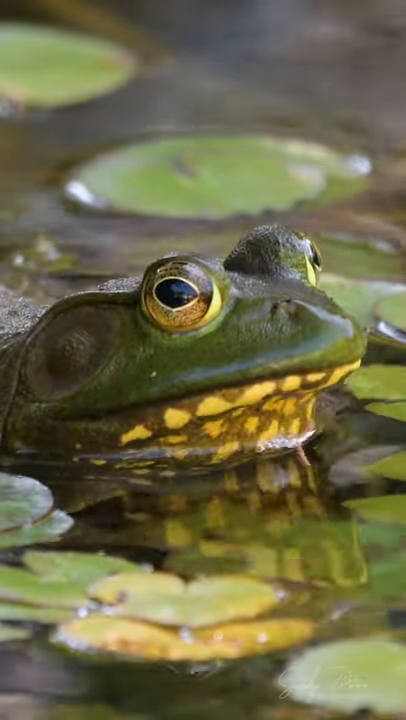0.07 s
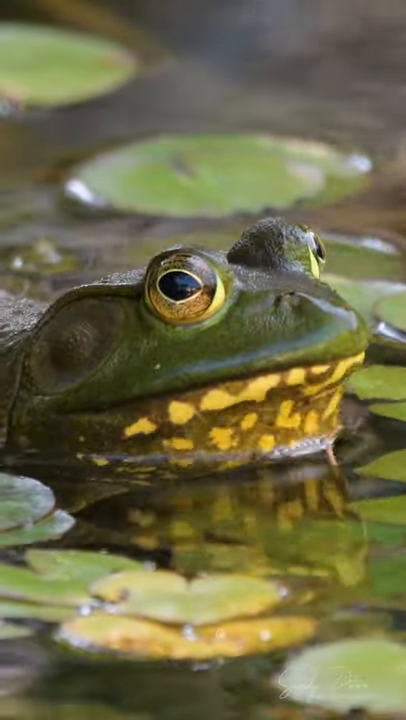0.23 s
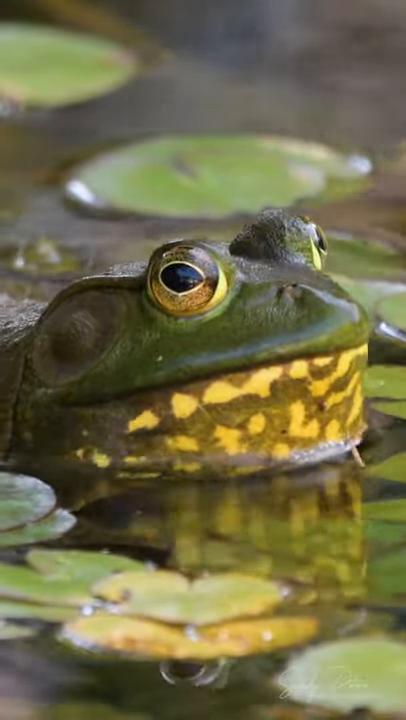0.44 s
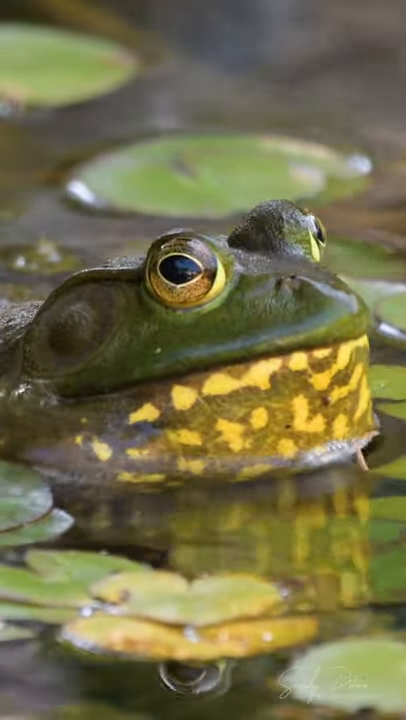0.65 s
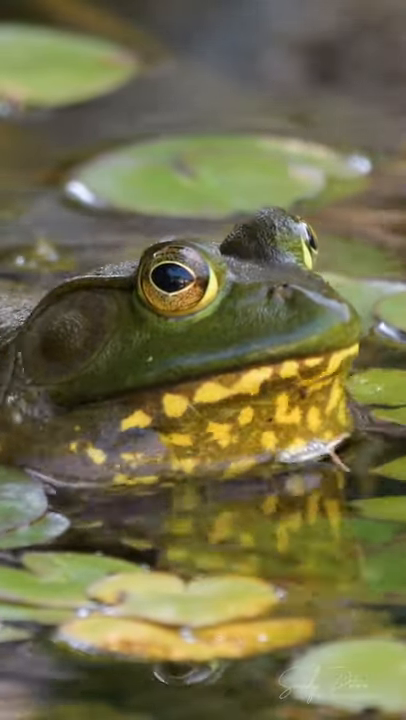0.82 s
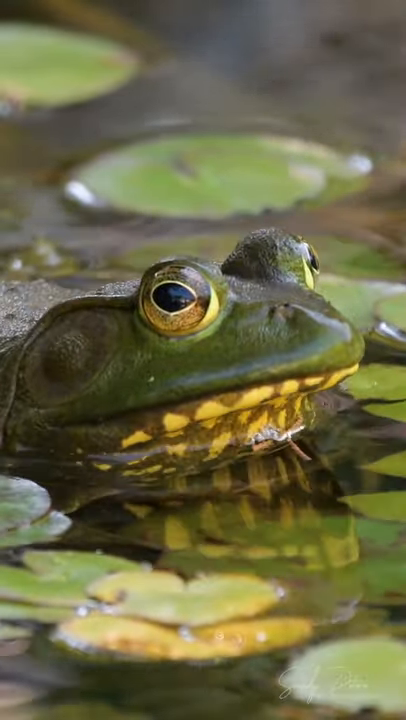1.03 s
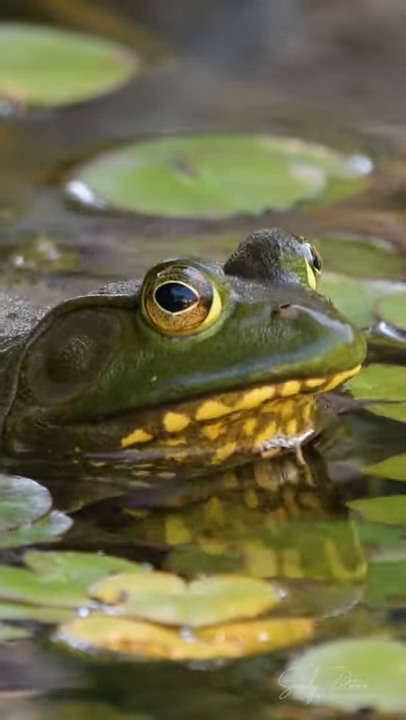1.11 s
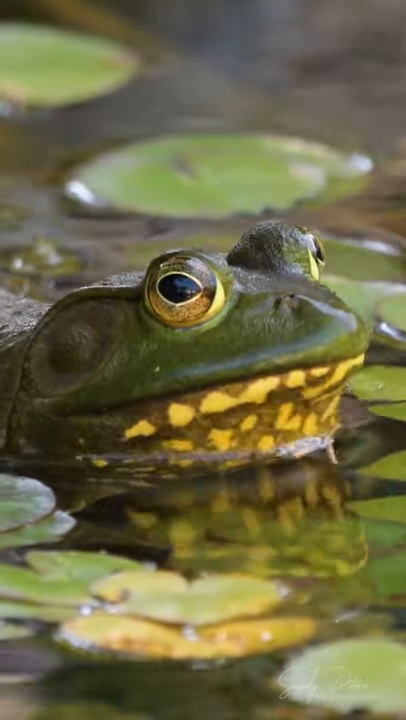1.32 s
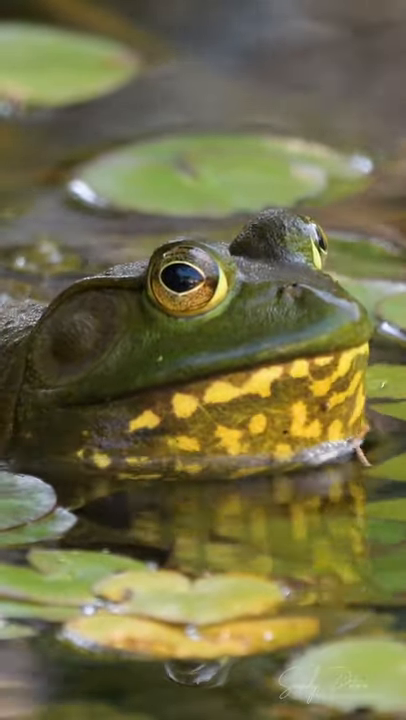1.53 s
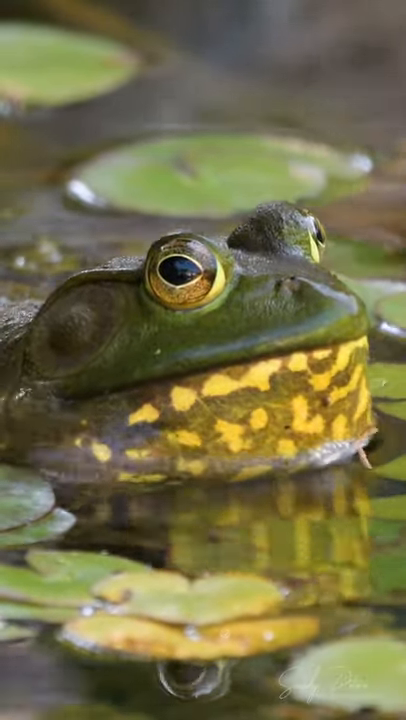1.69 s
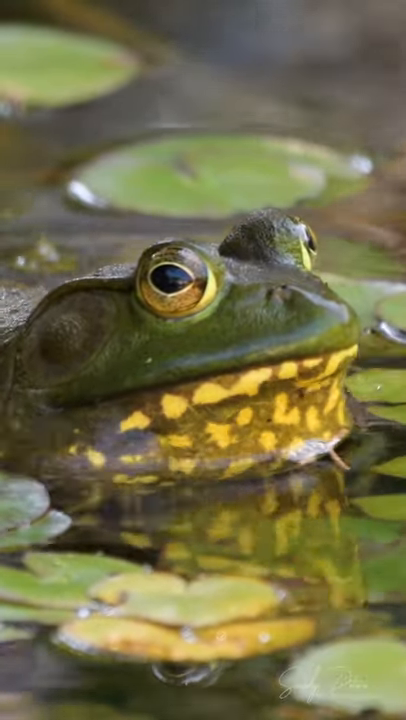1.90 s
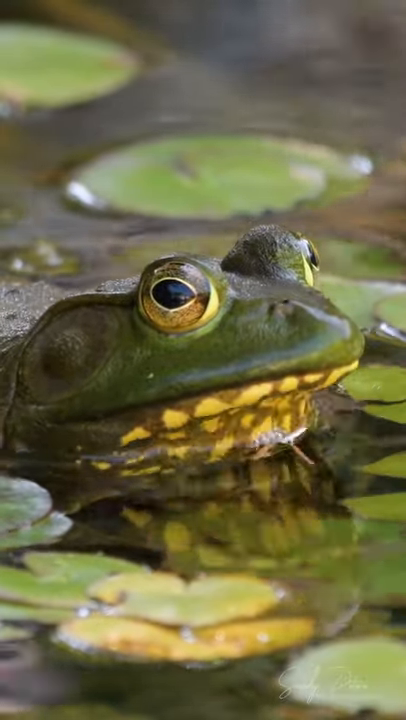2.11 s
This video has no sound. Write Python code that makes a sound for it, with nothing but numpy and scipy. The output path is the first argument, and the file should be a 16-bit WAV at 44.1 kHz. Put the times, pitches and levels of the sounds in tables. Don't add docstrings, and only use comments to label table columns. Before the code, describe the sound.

A bullfrog bellows twice, close to a stereo microphone, each call a low, buzzing, throaty hum that swells and drops away. Faint water wash, trickling bubbles and small drips continue around it in an outdoor pond.

```python
import sys
import numpy as np
from scipy import signal
from scipy.fft import rfft, irfft
from scipy.io import wavfile
from scipy.ndimage import uniform_filter1d

SR = 44100
rng = np.random.default_rng(int(sys.argv[2]) if len(sys.argv) > 2 else 0)


def level_to_linear(level):
    exponent = np.asarray(level, float) / 20
    return 10 ** exponent


def generate_wav(signal):
    frames = np.transpose(np.atleast_2d(signal))
    scaled = np.clip(frames, -1, 1) * 32767
    pcm = np.round(scaled).astype(np.int16)
    wavfile.write(sys.argv[1], SR, pcm)


N = 94815

# (frequency [Hz], level [dB])
WATER_DB = [(25, -28), (70, -8.5), (250, -12.5), (1300, -7.5), (3000, -7.5), (5000, -13.5), (6900, -12.5),
            (7500, -23.5)]


def evened(x):
    return x / np.sqrt(np.mean(x ** 2) + 1e-20)


def read(points, hz):
    f, value = np.transpose(points)
    return np.interp(np.log(hz + 1), np.log(f + 1), value)


def drift(hz):
    return evened(signal.lfilter(*signal.butter(2, hz, fs=SR), rng.standard_normal(N)))


def ring(x, hz, width_hz):
    turn = np.exp(2j * np.pi * np.cumsum(hz * np.ones(len(x))) / SR)
    pole = np.exp(-np.pi * width_hz / SR)
    return 2 * (turn * signal.lfilter([1 - pole], [1, -pole], x / turn)).real


def ring_twice(x, hz, width_hz):
    return ring(ring(x, hz, width_hz), hz, width_hz)


def coloured(x, db_of):
    hz = np.fft.rfftfreq(2 * N, 1 / SR)
    return irfft(rfft(x, 2 * N) * level_to_linear(db_of(hz)))[..., :N]


def left_right(pan_db):
    return np.outer([.5, -.5], pan_db)


def machine():
    # (frequency [Hz], width [Hz], level [dB])
    hum_lines = [(63, 14, -58), (116.8, 5.6, -51.5), (127, 4.3, -52)]
    out = 0
    for hz, width_hz, db in hum_lines:
        out = out + level_to_linear(db) * evened(ring_twice(rng.standard_normal(N), hz, width_hz))
    return out * level_to_linear(np.array([[.8], [-.8]]))


def whistle():
    # (time [s], frequency [Hz], level [dB])
    whistle_path = [(.56, 6000, -75), (.6, 5915, -40), (.65, 5860, -46), (.7, 5580, -34.5),
                    (.74, 5450, -75)]
    fuzz_hz = 160
    s, hz, db = np.transpose(whistle_path)
    t = np.arange(N) / SR
    tone = ring_twice(rng.standard_normal(N), np.interp(t, s, hz), fuzz_hz)
    return level_to_linear(np.interp(t, s, db, -120, -120)) * evened(tone)


def patchy(shape, bins, frames):
    relief = uniform_filter1d(rng.standard_normal(shape), size=bins, axis=0)
    return evened(uniform_filter1d(relief, size=frames, axis=1))


def wash():
    # (frequency [Hz], left-right likeness [0-1])
    likeness = [(60, 0.26), (180, 0.84), (550, 0.73), (1650, 0.68), (4970, 0.26), (15000, 0.44)]
    # (frequency [Hz], left-right difference [dB])
    wash_pan = [(60, 7), (550, 1.5), (1650, -1), (4000, 1.5), (8000, -7.5), (13000, 8)]
    # (frequency [Hz], level [dB])
    air = [(7500, 0.5), (9000, -0.5), (11500, -2), (13500, -11.5), (15000, -19), (15800, -25)]
    wash_db, patch_db, flicker_db, rustle_db = -32, 2.75, 1.14, 2.5
    frames, hz = N // 64 + 5, np.fft.rfftfreq(256, 1 / SR)
    shape = (129, frames)

    a, b, c, d = rng.standard_normal((4, *shape))
    left, other = a + 1j * b, c + 1j * d
    same = np.clip(read(likeness, hz), -1, 1)[:, None]
    z = np.array([left, same * left + np.sqrt(1 - same ** 2) * other])

    flicker = evened(uniform_filter1d(rng.standard_normal(frames), size=6))
    swell_db = patch_db * patchy(shape, 5, 8) + flicker_db * flicker + rustle_db * patchy(shape, 14, 70)
    z = z * level_to_linear(swell_db * np.clip(hz / 1500, 0, 1)[:, None])
    x = signal.istft(z, nperseg=256, noverlap=192)[1][:, :N]
    x = coloured(x, lambda f: read(WATER_DB, f) + read(air, f) + left_right(read(wash_pan, f)))
    return level_to_linear(wash_db) * evened(x)


def bubble(hz, ring_s, glide=0.065):
    u = np.arange(int(3 * ring_s * SR) + 9) / SR / ring_s
    envelope = 3.46 * u * np.exp(1 - 1.76 * u)
    return envelope * np.sin(2 * np.pi * hz * ring_s * (u + glide * u ** 2 / 2))


def trickle():
    level_db, bubbles_per_s, size_db, side_db = -41.5, 640, 4.0, 1.2
    pitches_hz = np.geomspace(500, 7000, num=30)
    out = np.zeros((2, N))
    for hz in pitches_hz:
        starts = rng.random(N) < bubbles_per_s / SR / len(pitches_hz)
        size = starts * level_to_linear(size_db * np.minimum(rng.exponential(1, N), 3))
        side = level_to_linear(side_db * np.outer([1, -1], rng.standard_normal(N)))
        sound = bubble(hz, rng.uniform(4.9, 6.3) / hz)
        train = signal.oaconvolve(size * side, sound[None], axes=1)[:, :N]
        out += train * level_to_linear(read(WATER_DB, hz)) * hz
    return level_to_linear(level_db) * evened(out)


def ticks():
    # (time [s], level [dB], centre [Hz])
    single_ticks = [(0.063, -23, 10000), (0.081, -23, 10500), (.15, -20, 11800), (.275, -31, 7500),
                    (.46, -24.5, 10800), (.61, -32, 11500), (.86, -33, 11530), (.983, -16, 7500),
                    (1.042, -34, 8000), (1.28, -22, 6000), (1.47, -14, 5000), (1.522, -16, 8500),
                    (1.839, -13, 5660), (1.979, -26, 9100), (2.09, -35, 11000)]
    decay_s, width_hz = 0.0031, 2500
    fizz_db, fizz_per_s = -61.5, 160
    fade = np.exp(-np.arange(600) / SR / decay_s)

    size = level_to_linear(fizz_db + 15.5 + 1.4 * np.minimum(rng.exponential(1, N), 3))
    starts = (rng.random(N) < fizz_per_s / SR) * size
    grain = .6 * rng.standard_normal((2, N)) + .6 * np.outer([1, -1], rng.standard_normal(N))
    burst = np.convolve(starts, fade)[:N] * grain
    fizz_colour = [(2000, -66), (5000, 13.5), (10000, 5), (15000, -7)]  # (Hz, dB)
    out = coloured(burst, lambda hz: read(fizz_colour, hz))

    for s, db, hz in single_ticks:
        noise = rng.standard_normal((2, len(fade)))
        a, b = (evened(ring_twice(v, hz, width_hz)) for v in noise)
        start = round(s * SR)
        out[:, start:start + len(fade)] += level_to_linear(db) * fade * np.array([a, .7 * b - .4 * a]) / 2
    return out


def drips():
    # (time [s], frequency [Hz], level [dB], ring [s])
    drip_list = [(0.041, 6800, -29.5, .002), (.104, 3490, -32.5, 0.0029), (.173, 3600, -36.5, 0.0021),
                 (.795, 2500, -29, 0.0025), (.797, 2980, -29, 0.0023), (.863, 3670, -30.5, 0.0014),
                 (.949, 1200, -43, 0.0045), (0.999, 1260, -29, 0.0036), (1.065, 2480, -42, 0.0038),
                 (1.147, 3020, -36.5, 0.0026), (1.239, 1450, -35, 0.0062), (1.988, 785, -32.5, 0.0029),
                 (2.01, 1230, -36, 0.0038), (2.02, 1350, -27, 0.0017), (2.053, 1480, -28, 0.0029),
                 (2.05, 768, -38, 0.012), (2.066, 2570, -34, 0.0034), (2.067, 1560, -36, 0.0052),
                 (2.0879, 785, -26.5, 0.003), (2.106, 834, -34, 0.004), (0.685, 5670, -29, 0.0012),
                 (0.689, 6700, -28.5, 0.0012), (.697, 6700, -32, 0.0037), (2.07, 960, -37, 0.0042),
                 (1.855, 698.6, -34.5, 0.0043), (1.92, 750, -40.5, 0.0053), (.29, 3800, -33, 0.0037),
                 (.372, 3800, -30, 0.0023), (.557, 6460, -35, .002), (2.123, 3070, -32.5, 0.0018)]
    out = np.zeros(N + SR)
    for s, hz, db, ring_s in drip_list:
        sound = level_to_linear(db) * bubble(hz, ring_s, glide=0.01)
        out[round(s * SR):][:len(sound)] += sound
    return out[:N]


def bank(x):
    t60_s, taps_share = .07, .05
    t = np.arange(4000) / SR
    taps = rng.standard_normal((2, 4000)) * (rng.random((2, 4000)) < taps_share)
    taps = taps * level_to_linear(-60 * t / t60_s) * (t > .001)
    wet = signal.fftconvolve(x[None], taps / np.linalg.norm(taps[0]), axes=1)[:, :N]
    return coloured(wet, lambda hz: read([(300, -14), (700, 0), (1500, 3.5)], hz))


def sac_hum(turns, hum_db, third_db, rasp_db):
    # (time [s], rate [Hz])
    flutter_path = [(.2, 36.17), (.5, 50.2), (.68, 43.98), (1.3, 37.89), (1.55, 45.64), (1.72, 42.06)]
    sidebands = [(2, 1), (3, -1), (3, 1), (4, -1), (5, 1), (6, -1), (6, 1)]
    sideband_db = [-27, -19.5, -21, -25.5, -22.5, -24.5, -30]
    fourth_db, flutter_fuzz_hz, flutter_swell_db = -18.5, 6, 2.8
    t = np.arange(N) / SR
    flutter_hz = np.interp(t, *np.transpose(flutter_path)) + flutter_fuzz_hz * drift(13.6)
    beat = np.cumsum(flutter_hz) / SR
    even = np.cos(4 * np.pi * turns) + level_to_linear(fourth_db) * np.cos(8 * np.pi * turns)
    hum = level_to_linear(hum_db) * even + level_to_linear(third_db) * np.cos(6 * np.pi * turns)
    for (partial, side), db in zip(sidebands, sideband_db):
        level = level_to_linear(rasp_db + db + flutter_swell_db * drift(12.3))
        hum = hum + level * np.cos(2 * np.pi * (partial * turns + side * beat))
    return hum


def fold_slaps(turns, hz, effort_db):
    slip_s, slip_cycles, jitter_s, shimmer_db, rebound_db = .0015, 2.9, .00014, 2.2, -12
    late_s = slip_s * ((turns / slip_cycles + .12 * drift(15)) % 1 - .5) + jitter_s * drift(150)
    late_s = late_s * np.clip(1.3 + effort_db / 16, .3, 1)
    slaps, snaps = np.zeros((2, N))
    for shift_turns, db in [(0, 0), (.38, rebound_db), (.68, rebound_db)]:
        phase = turns - hz * late_s - shift_turns * (1 + .15 * drift(60))
        step = np.maximum.accumulate(np.floor(phase))
        shimmer = level_to_linear(shimmer_db * rng.standard_normal(N).clip(-1.5, 1.5))
        train = -np.diff(step, prepend=0).clip(0, 1) * shimmer
        slaps = slaps + level_to_linear(db / 2) * train
        snaps = snaps + level_to_linear(db) * train
    return slaps, snaps


def body_rasp(slaps, snaps, effort_db):
    # (frequency [Hz], width [Hz], level [dB])
    body_rings = [(660, 50, -13), (690, 60, -13), (870, 32, -12.5), (1030, 14, -7), (1220, 100, -8.5),
                  (1291, 27, 6), (1337.5, 40, 11), (1558, 35, 2), (1497, 26, 2.5), (1777, 18, -10.5),
                  (1890, 20, -5), (2250, 20, -5.5), (3200, 230, -7), (3800, 330, -17)]
    snap_hz, snap_width_hz, snap_db = 1700, 580, -3.5
    puff, sway_share, bright_db_per_db = .15, .006, 2.5
    narrowest_hz = 38
    evening = .35
    band_hz = [570, 4030]
    snaps = ring_twice(snaps, snap_hz, snap_width_hz)
    drive = evened(slaps) + puff * rng.standard_normal(N)
    sway = 1 + sway_share * drift(9.9)

    def rung(rings):
        return sum(level_to_linear(db) * ring(drive, hz * sway, max(width_hz, narrowest_hz)) / np.sqrt(width_hz)
                   for hz, width_hz, db in rings)

    low, high = rung(body_rings[:8]), rung(body_rings[8:])
    low = low / np.sqrt(uniform_filter1d(evened(low) ** 2, size=700) + .05) ** evening
    high = high + level_to_linear(snap_db) * np.std(low) * evened(snaps)
    rasp = (low + level_to_linear(bright_db_per_db * effort_db) * high) / np.std(low + high)
    return signal.sosfilt(signal.butter(4, band_hz, "band", fs=SR, output="sos"), rasp)


def bellow(rows):
    # (time [s], fall [s], recovery [s], rasp drop [dB], hum drop [dB])
    catches = [
        (0.271, 0.0031, .01, 2.5, 9),
        (0.33, 0.011, 0.019, 12, 4),
        (.415, 0.0066, 0.01, 2, 11),
        (.445, 0.018, 0.029, 3.5, -0.5),
        (0.546, 0.0079, 0.018, 7, 25),
        (.61, 0.0084, 0.028, 1, 2.5),
        (1.41, .005, 0.0093, -0.5, 1),
        (1.472, 0.016, 0.022, 4.5, 1),
        (1.601, 0.0075, 0.033, 3, 7),
    ]
    wobble_db = 2.5
    t = np.arange(N) / SR
    s, *columns = np.transpose(rows)
    curves = (uniform_filter1d(np.interp(t, s, c), size=400) for c in columns)
    hz, hum_db, third_db, rasp_db = curves
    on = (t > s[0]) & (t < s[-1])
    for at_s, fall_s, recovery_s, rasp_drop_db, hum_drop_db in catches:
        dip = np.exp(-.5 * ((t - at_s) / np.where(t < at_s, fall_s, recovery_s)) ** 2)
        rasp_db = rasp_db - rasp_drop_db * dip
        hum_db = hum_db - hum_drop_db * dip
    effort_db = rasp_db - rasp_db.max()
    turns = np.cumsum(hz) / SR
    hum_db = hum_db + wobble_db / 2 * drift(34)
    third_db = third_db + wobble_db * drift(48) * level_to_linear(effort_db / 2)
    hum = sac_hum(turns, hum_db, third_db, rasp_db)
    rasp = body_rasp(*fold_slaps(turns, hz, effort_db), effort_db)
    return on * (np.sqrt(2) * hum + level_to_linear(rasp_db) * rasp)


def bullfrog():
    # (time [s], fold rate [Hz], hum level [dB], third partial level [dB], rasp level [dB])
    bellows = [
        [(.17, 110.4, -58, -66, -49), (.21, 112, -38.5, -73, -31), (.29, 110.4, -31, -46, -17),
         (.4, 113.1, -32, -38, -15), (.52, 114.6, -27.5, -37.5, -13.5), (.68, 116.1, -19.5, -26, -13.5),
         (.75, 115, -23.5, -27.5, -17.5), (.81, 106.9, -38.5, -33.5, -33.5), (.9, 108, -47.5, -83, -69)],
        [(1.26, 107.6, -48, -48, -43), (1.34, 109.9, -38, -47, -29), (1.44, 110.3, -30.5, -37, -15),
         (1.57, 111.7, -26.5, -33, -15.5), (1.7, 113.6, -24.5, -31, -14), (1.79, 113, -27.5, -29.5, -18),
         (1.86, 108.4, -37, -29, -28), (1.91, 109.2, -38, -49, -36), (1.97, 109, -62, -71, -62)],
    ]
    return sum(bellow(rows) for rows in bellows)


def placed(frog):
    # (frequency [Hz], left-right difference [dB])
    voice_pan = [(200, 1.7), (380, 3), (700, 1.5), (1290, 2.5), (2400, -1.5)]
    left_lag_samples = 2
    left, right = coloured(frog, lambda hz: left_right(read(voice_pan, hz)))
    return np.array([np.roll(left, left_lag_samples), right])


def scene():
    bank_db = -11
    frog, near = bullfrog(), drips()
    close = placed(frog) + near + level_to_linear(bank_db) * bank(frog + near)
    return close + wash() + trickle() + ticks() + machine() + whistle()


def band_limit(x):
    return signal.sosfilt(signal.butter(12, 15750, fs=SR, output="sos"), x)


def record(dry):
    # (frequency [Hz], width [Hz], level [dB])
    treble_dips = [(7730, 133, -32), (9650, 230, -30), (7520, 600, -7.5)]
    knee = 1.15

    def dips_db(hz):
        return sum(db * np.exp(-((hz - f) / width_hz) ** 2) for f, width_hz, db in treble_dips)

    x = coloured(dry, dips_db)
    return band_limit(knee * np.tanh(x / knee))


dry = scene()
out = record(dry)
generate_wav(out)
```